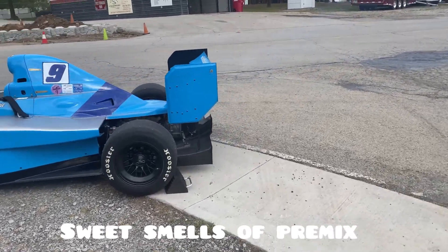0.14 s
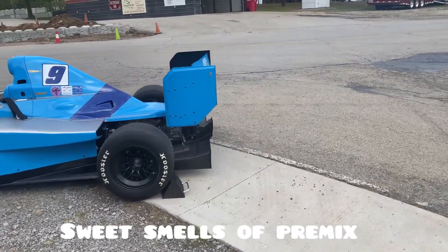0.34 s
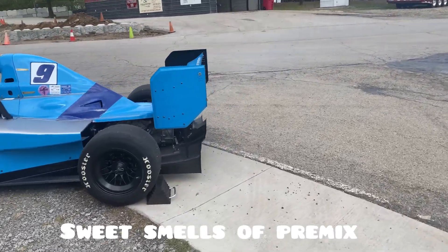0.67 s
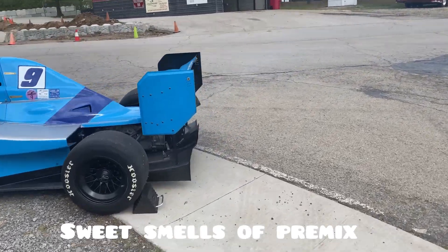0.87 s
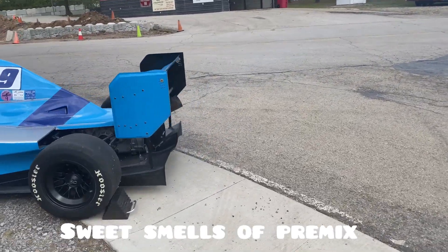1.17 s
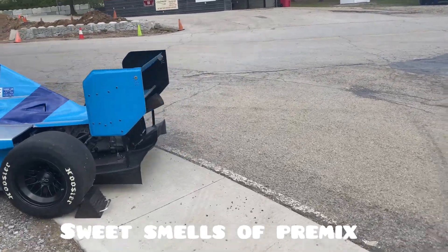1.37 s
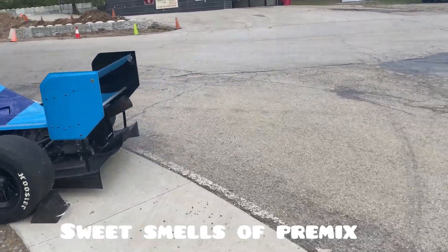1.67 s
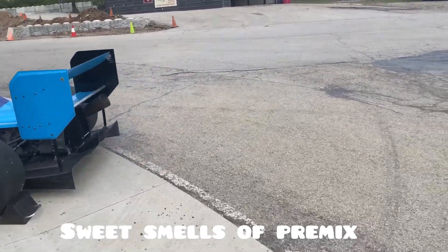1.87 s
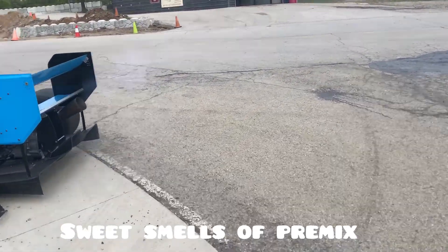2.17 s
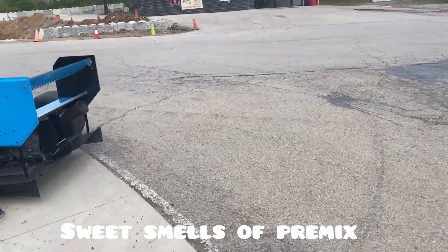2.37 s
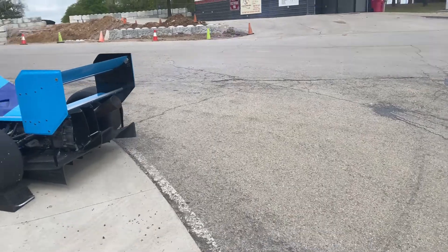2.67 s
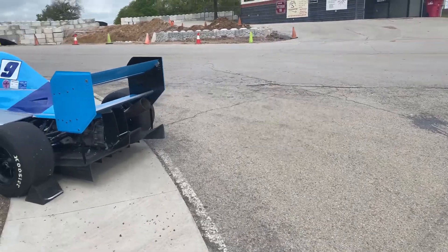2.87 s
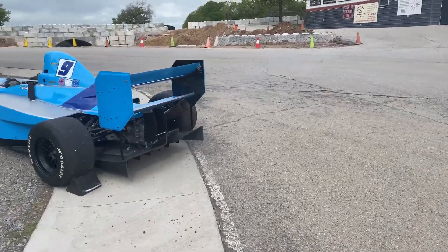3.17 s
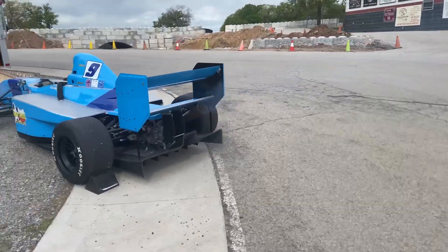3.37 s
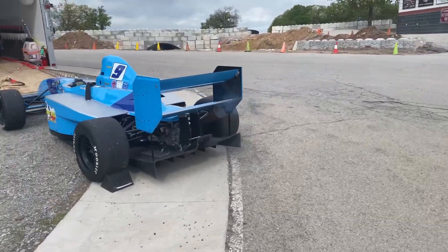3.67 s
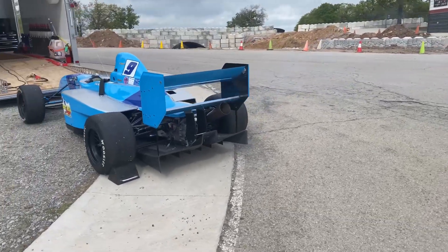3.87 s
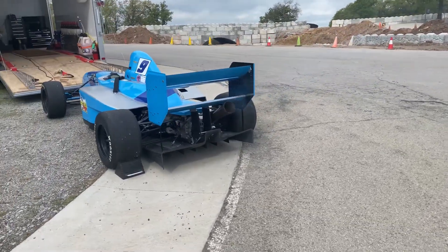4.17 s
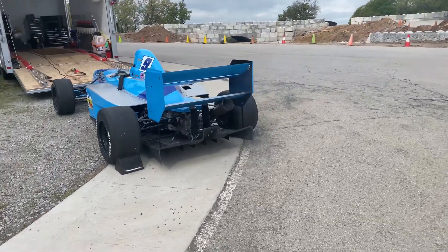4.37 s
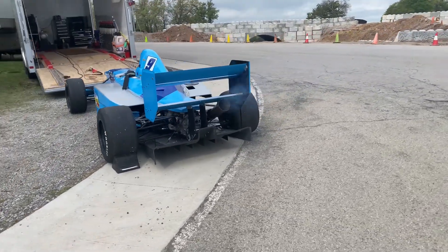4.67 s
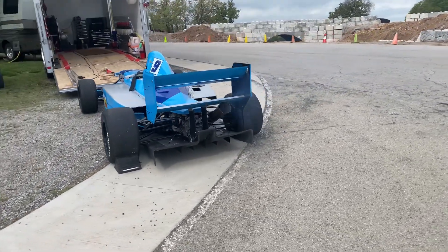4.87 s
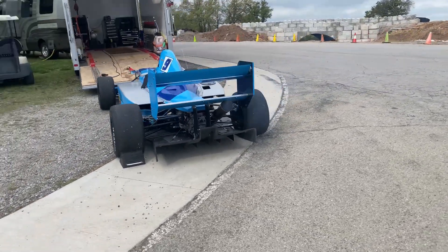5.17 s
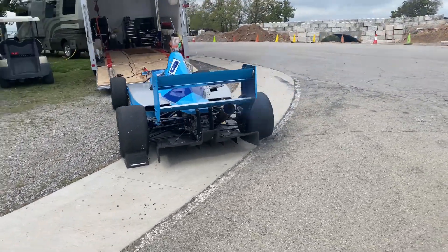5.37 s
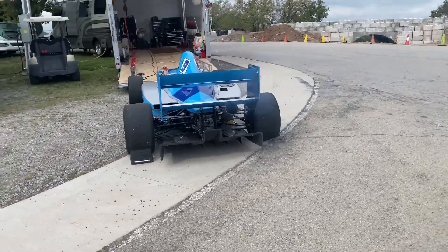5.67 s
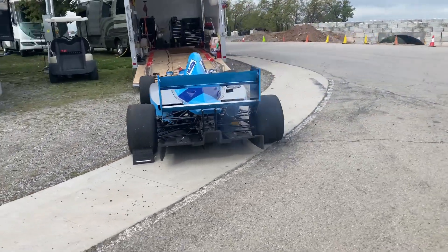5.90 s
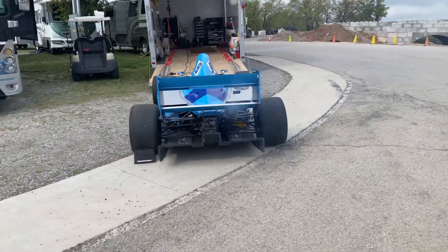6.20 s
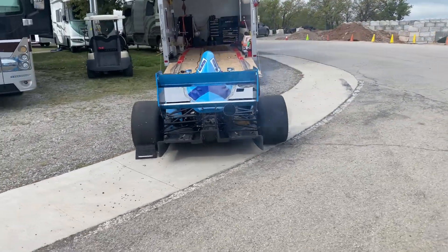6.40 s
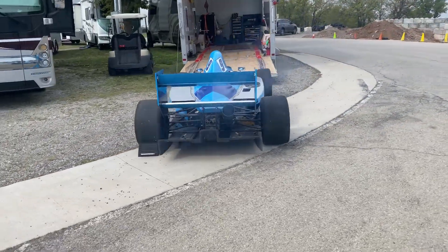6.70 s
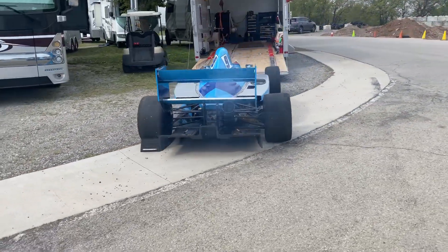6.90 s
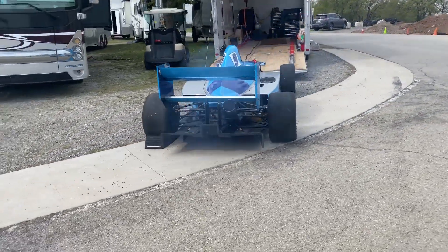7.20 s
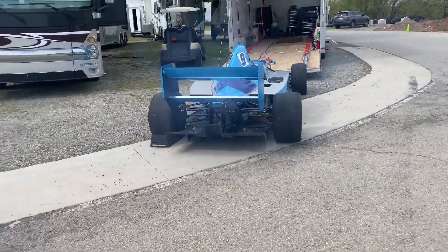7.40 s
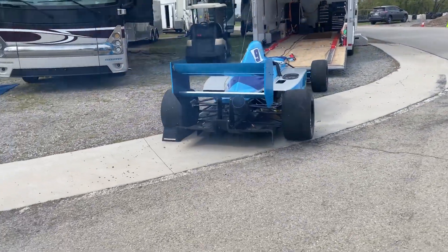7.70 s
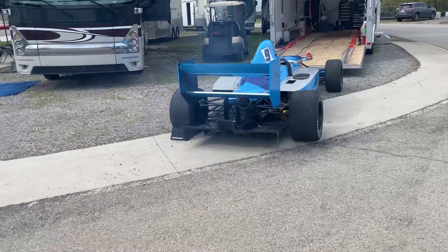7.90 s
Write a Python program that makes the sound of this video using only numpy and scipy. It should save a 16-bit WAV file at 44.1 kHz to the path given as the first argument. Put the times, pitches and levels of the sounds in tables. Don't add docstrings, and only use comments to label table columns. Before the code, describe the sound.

A rotary race engine idles unevenly on a paved pad. Quick runs of four to six sharp exhaust cracks with deep thumps speed up, then misfire into softer low puffs, about three bursts a second. Occasional pops follow. A handheld stereo microphone moves from beside the car to behind the exhaust, where the spits become shorter, brighter and hissier. Short reflections come from ground and trailers; the idle eases slightly lower and never stops.

```python
import sys
import numpy as np
from scipy import signal
from scipy.fft import rfft, irfft, next_fast_len
from scipy.io import wavfile
from scipy.ndimage import uniform_filter1d

SR = 44100
rng = np.random.default_rng(int(sys.argv[2]) if len(sys.argv) > 2 else 0)


def ratio(d):
    e = np.asarray(d, float) / 20
    return 10 ** e


def pcm_store(signal):
    levels = np.round(np.clip(np.atleast_2d(signal), -1, 1) * 32767)
    wavfile.write(sys.argv[1], SR, levels.astype(np.int16).T)


N = 355005
TIME = np.arange(N) / SR

# (time [s], unburnt puff level [dB], boom level [dB])
LOAD = [(0, -17.5, -6.5), (1, -19.5, -9), (2, -20, -9), (3, -19, -9.5), (4, -22, -10.5), (5, -21.5, -13.5),
        (6, -20.5, -12), (7, -21.5, -10), (8.05, -21.5, -13.5)]
# (time [s], facing the tail pipe [0-1], car off to the side [0-1])
WALK = [
    (0, 0.02, 0.3),
    (1, 0, 0.29),
    (1.5, 0.28, 0.68),
    (2.2, 0.34, 0.98),
    (2.7, 0.39, 0.56),
    (3.2, 0.28, 0.09),
    (4, 0.8, 0.03),
    (6, 0.93, 0.05),
    (8.05, 0.95, 0.1),
]
# (frequency [Hz], width [Hz], level [dB])
PIPE = [(229.4, 37.3, 3.5), (165.4, 82.5, 4.5), (192, 12, -17), (307, 39, -9), (391.7, 42.2, -7)]
# (frequency [Hz], width [Hz], level [dB])
BOOM = [(68.5, 13.6, 0), (91, 130, -1)]
# (frequency [Hz], width [Hz], level [dB])
FLANK = [(302.2, 52.7, 7), (367.3, 27, -8), (510, 50, -10.5)]
DRIER_BEHIND_DB = -3


def ignition():
    # (first [s], last [s], firings [count], strength [dB],
    # lead of one rotor over the other [dB])
    runs = [(.044, 0.099, 4, -12.5, -3.5), (0.38, 0.4338, 4, -10.5, -1), (0.9105, 0.9953, 6, -9, -1.5),
            (1.7572, 1.842, 6, -7, -0.5), (2.0598, 2.131, 5, -7.5, 5.5), (2.3588, 2.4311, 5, -7, 0.5),
            (2.6695, 2.7596, 6, -7.5, -4.5), (2.9828, 3.053, 5, -6, 0), (3.3231, 3.3924, 5, -6.5, -0.5),
            (3.9418, 4.0114, 5, -8.5, 4.5), (4.1878, 4.24, 4, -6.5, -0.5), (4.6787, 4.7309, 4, -8, -2.5),
            (4.9174, 4.9693, 4, -8.5, -0.5), (5.1745, 5.2582, 6, -8, -2), (5.5073, 5.587, 6, -9.5, -1.5),
            (5.8193, 5.892, 5, -8.5, 2), (6.122, 6.2074, 6, -8.5, -0.2), (6.469, 6.536, 5, -10, 3),
            (6.741, 6.834, 6, -11, -2), (7.043, 7.0982, 4, -9, 1.3), (7.3382, 7.4014, 5, -10, -1.5),
            (7.6403, 7.7246, 6, -10, 0.5),
            (0.5581, 0.5757, 2, -5.5, -1),
        (0.723, 0.737, 2, -9.5, -2.5),
        (1.2125, 1.2478, 3, -5.5, 2.5),
        (1.4047, 1.4226, 2, -13.5, -2),
        (1.4883, 1.5243, 3, -8, 1.5),
        (1.559, 1.5743, 2, -7.5, 5.5),
        (3.6389, 3.676, 3, -6, 0),
        (4.4176, 4.4348, 2, -7.5, -4),
        (7.9967, 8.035, 3, -10.5, -4),
    ]
    # (time [s], crack level [dB], thump
    # level [dB])
    lone = [(.0005, -14, -4.5), (.1282, -9, -4.5), (0.2537, -8.5, -7), (0.341, -10, -2.5),
            (0.6385, -12, -6.5), (0.68, -13, -5), (.773, -8.5, -3), (1.1488, -6, -6.5), (1.279, -3.5, -7.5),
            (1.7346, -13, -14), (1.9958, -5, -6), (2.9144, -21, -14), (3.7053, -9, -10), (3.883, -5.5, -3),
            (4.1461, -7.5, -12.5), (4.3742, -11, -13), (4.4691, -8.5, -6), (4.5027, -10.5, -13),
            (4.6355, -9, -10.5), (4.8775, -5, -5.5), (5.4854, -24, -19), (6.3178, -8, -8.5),
            (6.4482, -22.5, -22), (6.9958, -10, -10), (7.1305, -10, -16), (7.261, -10, -9.5),
            (7.3012, -9.5, -7), (7.8349, -9.5, -9.5), (7.8701, -8.5, -9), (7.9718, -16.5, -32)]
    gap_ratio = 0.91
    boom_share = 0.37

    rows = [(s, db, db + 3, thump_db, boom_share * db + 3) for s, db, thump_db in lone]
    for first, last, count, db, lead_db in runs:
        k = np.arange(round(count))
        passed = np.cumsum(gap_ratio ** k) - 1
        times = first + (last - first) * passed / passed[-1]
        rotor = lead_db * (-1.0) ** k
        along = k / 5
        cold_db = -5.5 * (k == 0)
        spit_db = db + 0.4 - 3.5 * along + rotor
        shock_db = db - 1.5 + 9.5 * along - 0.28 * rotor + cold_db
        thump_db = db - 2.5 + 3 * along - 0.16 * rotor
        rows += zip(times, spit_db, shock_db, thump_db, boom_share * db + 0 * k)
    s, *levels = np.transpose(sorted(rows))
    levels = np.transpose(levels) + rng.standard_normal((len(s), 4)) * [1.2, 2.2, 2.2, 0]
    levels[:, 3] += np.interp(s, TIME, curve(LOAD, 2))
    return np.column_stack([s, levels])


def firings(fires, gas):
    # (time [s], spit level [dB], shock level [dB])
    pops = [(0.4407, -21, -0.5), (1.0048, -22, -12), (1.2592, -15, -11), (1.8513, -31, -10),
            (2.4409, -9, -2), (2.7689, -25, -4), (3.0615, -8.5, -8), (3.403, -15, 6), (3.4163, -13, -6),
            (3.6853, -5, 3), (3.7164, -9, 3), (3.7291, -12, -23), (4.7398, -34, 0.5), (5.2687, -13, -1),
            (5.5989, -26, -6.5), (5.9025, -7, -34), (5.9178, -19, -21), (6.2176, -22, -9),
            (6.5471, -27, -5), (6.842, -41, 1), (7.3124, -42, -15), (7.7342, -18, -6)]
    # (frequency [Hz], width [Hz], level [dB])
    mouth = [(823, 190, -6), (530, 103, -7), (912, 320, 0), (1460, 870, 0), (1860, 210, -13)]

    s, _, _, thump_db, boom_db = fires.T
    thump = ratio(6.0) * strike(s + 0.00477, thump_db, PIPE, 0.0066, 0.047)
    flank_db = thump_db + 1.5 - 5.62 * np.interp(s, TIME, curve(WALK, 1))
    thump += strike(s + 0.0012, flank_db, FLANK, 0.0037, 0.11)
    gap = np.diff(s, prepend=-0.02)
    rich_db = 0.77 * np.log(np.clip(gap / 0.029, 1, 3))
    boom = ratio(6.5) * strike(s + 0.00867, rich_db + boom_db, BOOM, 0.0069, 0.045)

    s, spit_db, shock_db = np.vstack([fires[:, :3], pops]).T
    shock = ratio(-2) * strike(s + 0.00028, shock_db, mouth, 0.00015, 0.07)
    train = clicks(s, spit_db)
    flow = ratio(-1) * burst(train, 0.00054, 0.0023, 0.0044, -25, 0.0047)
    crisp = ratio(1.0) * burst(train, 0.00051, 0.0022, 0.0018, -22, 0.0071)
    body = dulled(gas, 3500)
    behind = flow * body + crisp * (gas - body)
    facing = np.clip(curve(WALK, 1), 0, 1)
    spit = (1 - facing) * flow * gas + facing * behind
    returned = late(shock + dulled(spit, 4000), 0.011)
    returned *= ratio(-13.5 + DRIER_BEHIND_DB * curve(WALK, 1))
    return shock + spit + returned, thump + boom


def jet():
    # (frequency [Hz], level [dB])
    side_colour = [(300, 7.5), (800, 7), (1500, -2.5), (2500, -11), (3700, -30), (4800, -10), (6000, -18),
                   (9500, -18), (12000, -24.5), (16000, -24)]
    # (frequency [Hz], level [dB])
    behind_colour = [(300, 5.5), (800, -2), (1500, -6), (2500, -2.5), (3700, -10), (4800, -5.5),
                     (6000, -10), (9500, -10), (12000, -17.5), (16000, -17)]
    facing = np.clip(curve(WALK, 1), 0, 1)
    gas = (1 - facing) * hiss(side_colour) + facing * hiss(behind_colour)
    z = signal.stft(gas, nperseg=128)[2]
    patches = uniform_filter1d(rng.standard_normal(z.shape), size=3, axis=0)
    patches = uniform_filter1d(patches, size=6, axis=1)
    gas = signal.istft(z * ratio(2.6 * evened(patches)), nperseg=128)[1][:N]
    eddies = uniform_filter1d(rng.standard_normal(N), size=24)
    return gas * ratio(3.5 * evened(eddies))


def port_turns(fires):
    s = fires[:, 0]
    gap = np.diff(s)
    single = gap < 0.025
    period = np.interp(TIME, (s[:-1] + gap / 2)[single], gap[single])
    free = np.cumsum(1 / period) / SR
    at = np.interp(s, TIME, free)
    whole = np.cumsum(np.maximum(np.round(np.diff(at, prepend=at[0] - 1)), 1))
    eased = np.cumsum((0.0185 / period) ** 0.7) / 0.0185 / SR
    at = np.interp(s, TIME, eased)
    return np.interp(eased, np.append(at, at[-1] + 9), np.append(whole, whole[-1] + 9))


def coasting(fires, turns, gas):
    # (frequency [Hz], level [dB])
    puff_colour = [(40, -41), (200, 10.5), (400, -4.5), (850, -15.5), (1500, -24.5), (2500, -32.5),
                   (4800, -44), (8000, -49), (16000, -55)]
    opens = TIME[1:][np.diff(np.floor(turns)) > 0]
    rate = 1 / np.gradient(opens)
    uneven = rng.standard_normal((len(opens), 4))
    push_db = np.interp(opens, TIME, curve(LOAD, 1)) + 0.11 * (rate - 55)

    puff_train = clicks(opens, push_db + 2.5 * uneven[:, 0])
    puffs = hiss(puff_colour) * burst(puff_train, 0.0073, 0.0014, 0.0045, -7.0, 0.034)
    wisp_train = clicks(opens, push_db + 0.3 * (rate - 55) + 2.5 * uneven[:, 1])
    wisps = ratio(-13.5) * dulled(gas, 9400) * burst(wisp_train, 0.0042, 0.00055, 0.0041, -9.0, 0.018)

    knocks = ratio(3.5) * strike(opens, push_db + 1.2 * uneven[:, 2], PIPE, 0.0075, 0.034)
    flank_db = push_db - 2.0 - 16.0 * np.interp(opens, TIME, curve(WALK, 1)) + 3.8 * uneven[:, 0]
    knocks += strike(opens, flank_db, FLANK, 0.014, 0.055)
    dead = abs(opens[:, None] - fires[:, 0]).min(axis=1) > 0.004
    suck_db = (push_db + 0.5 + 2.2 * uneven[:, 3])[dead]
    suck = ratio(2.5) * strike(opens[dead] + 0.0047, suck_db, BOOM, 0.0046, 0.054)
    return puffs + wisps, knocks - suck


def yard(x):
    # (frequency [Hz], time to fall 60 dB [s])
    decay = [(100, 0.11), (420, 0.19), (1100, 0.079), (2900, 0.053), (8000, 0.049)]
    taps = np.zeros((3, SR // 2))
    at = np.arange(500, SR // 2 - 20, 20)
    shape = (3, len(at))
    np.put_along_axis(taps, at + rng.integers(0, 20, shape), rng.choice([-1.0, 1.0], shape), 1)
    hz, t, z = signal.stft(taps, SR, nperseg=256)
    fading = ratio(-60 * t / read(decay, hz)[:, None])
    tails = signal.istft(z * fading, SR, nperseg=256)[1][:, :SR // 4]
    turns = np.sqrt(2 / 3) * np.cos(np.pi * (TIME / 0.07 + np.arange(3)[:, None]) / 3)
    return signal.oaconvolve(x * turns, tails / np.linalg.norm(tails[0]), axes=1)[:, :N].sum(0)


def right_port(left):
    # (frequency [Hz], phase [rad])
    lag_ahead = [(0, 0), (1890, 0.2), (3010, 1.1), (5600, 0.9), (6200, 0.5), (7410, -1.1), (9730, -5.9),
                 (10600, -6.9), (13700, -12.3), (14600, -13.3), (15500, -15.6), (16100, -15.7)]
    # (frequency [Hz], phase [rad])
    lag_aside = [(0, 0), (1640, 2.8), (2670, 2.8), (4050, 6.4), (6720, 6.7), (9730, 0.4), (10700, -0.8),
                 (13500, -5.8), (14500, -6.8), (16100, -10.2)]
    # (frequency [Hz], left minus right level [dB])
    tilt = [(60, -4.5), (270, 2.5), (740, 3), (2200, 1), (3300, 3.5), (5500, 8), (7500, 2.5), (8800, 1.5),
            (16000, -0.5)]
    hz, t, z = signal.stft(left, SR, nperseg=256, noverlap=192)
    ahead = np.interp(hz, *np.transpose(lag_ahead))
    aside = np.interp(hz, *np.transpose(lag_aside))
    turn = np.angle(np.exp(1j * (aside - ahead)))
    phase = ahead[:, None] + np.outer(turn, np.interp(t, TIME, curve(WALK, 2)))
    z = z * np.exp(-1j * phase) / ratio(read(tilt, hz))[:, None]
    return signal.istft(z, SR, nperseg=256, noverlap=192)[1][:N]


def strike(times, db, modes, rise_s, spread):
    t = np.arange(0, 3600, 2) / SR
    out = np.zeros(N // 2 + 2000)
    hz, width, mode_db = np.transpose(modes)[:, :, None]
    fading = ratio(mode_db) * np.exp(-np.pi * width * t) * (1 - np.exp(-t / rise_s))
    tune = 1 + spread * rng.uniform(-1, 1, (len(times), len(modes), 1))
    for s, size, f in zip(times, ratio(db), tune):
        at = max(round(s * SR / 2), 0)
        ring = (fading * np.cos(2 * np.pi * hz * f * t)).sum(0)
        out[at:at + len(t)] += size * ring[:len(out) - at]
    return signal.resample_poly(out, 2, 1)[:N]


def burst(train, rise_s, hold_s, fall_s, tail_db, tail_s):
    t = np.arange(6000) / SR
    after = np.maximum(t - hold_s, 0)
    fall = np.exp(-after / fall_s) + ratio(tail_db) * np.exp(-after / tail_s)
    shape = (1 - np.exp(-t / rise_s)) * fall
    return np.sqrt(abs(signal.oaconvolve(train ** 2, shape ** 2)[:N]))


def clicks(times, db):
    train = np.zeros(N)
    np.add.at(train, np.clip((np.asarray(times) * SR).astype(int), 0, N - 1), ratio(db))
    return train


def hiss(points):
    size = next_fast_len(N)
    colour = ratio(read(points, np.fft.rfftfreq(size, 1 / SR)))
    return evened(irfft(rfft(rng.standard_normal(size)) * colour, size)[:N])


def evened(x):
    return x / np.sqrt(np.mean(x ** 2) + 1e-20)


def dulled(x, hz):
    return signal.sosfilt(signal.butter(1, hz, fs=SR, output="sos"), x)


def late(x, seconds):
    return np.interp(TIME - seconds, TIME, x, left=0)


def read(points, hz):
    f, value = np.transpose(points)
    return np.interp(np.log(hz + 1), np.log(f + 1), value)


def curve(table, column):
    table = np.array(table)
    return np.interp(TIME, table[:, 0], table[:, column])


def scene():
    gas, fires = jet(), ignition()
    sharp, deep = firings(fires, gas)
    puffs, low = coasting(fires, port_turns(fires), gas)
    sharp = sharp + puffs
    ground = ratio(-5.5) * dulled(late(sharp, 0.00117), 2500)
    direct = sharp + ground
    echoes = ratio(-12 + DRIER_BEHIND_DB * curve(WALK, 1)) * yard(dulled(direct, 5700))
    left = direct + echoes + deep + low
    unalike = ratio(-19 + 12.5 * curve(WALK, 2))
    stray = unalike * yard(direct - 0.9 * dulled(direct, 2200) + 0.12 * deep)
    return np.array([left + stray, right_port(left - stray)])


def low_pass(x):
    return signal.sosfilt(signal.butter(12, 16520, fs=SR, output="sos"), x)


def record(dry):
    cut = signal.sosfilt(signal.butter(3, 66, "high", fs=SR, output="sos"), dry)
    ceiling = 0.9
    held = ceiling * np.tanh(cut / ceiling)
    held = signal.oaconvolve(held, signal.firwin(255, 15800, fs=SR)[None], "same")
    return low_pass(held)


dry = scene()
out = record(dry)
pcm_store(out)
```